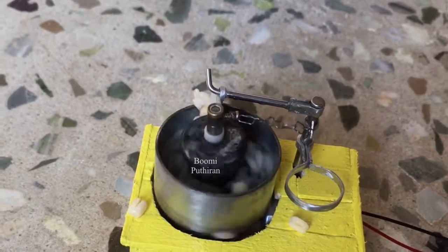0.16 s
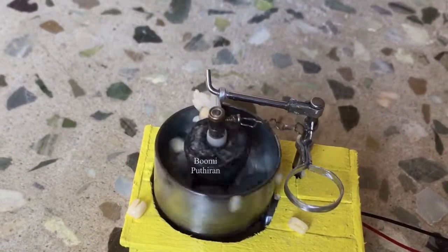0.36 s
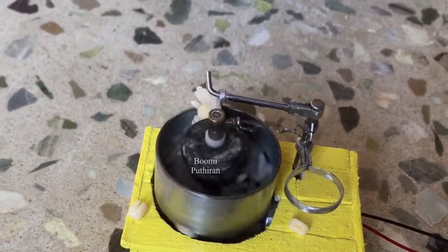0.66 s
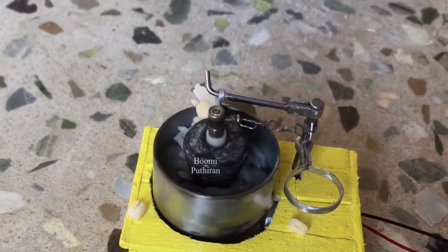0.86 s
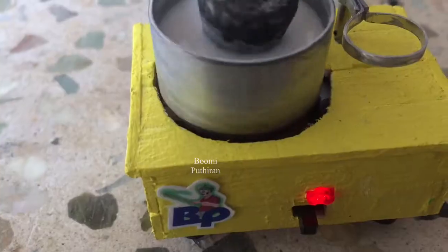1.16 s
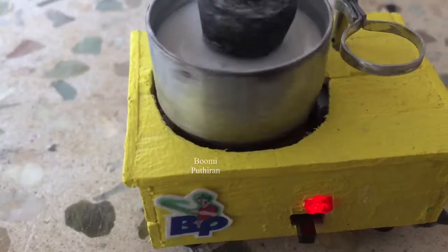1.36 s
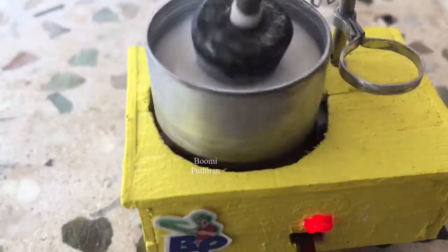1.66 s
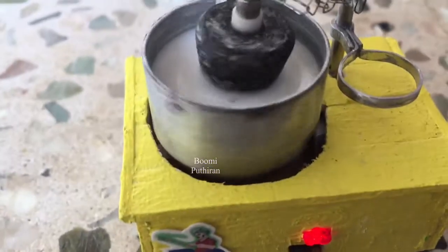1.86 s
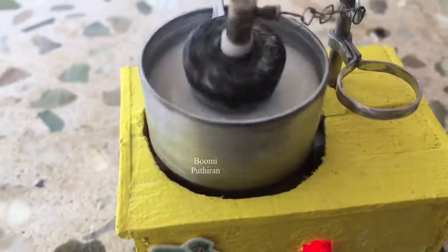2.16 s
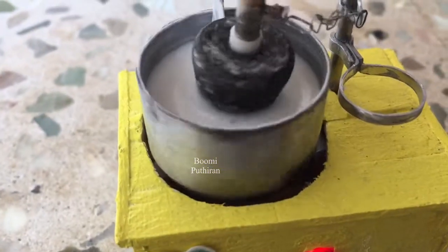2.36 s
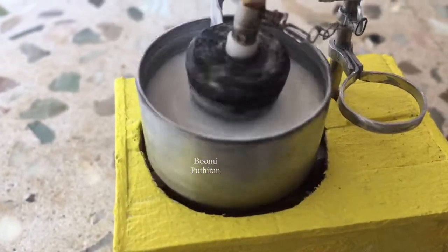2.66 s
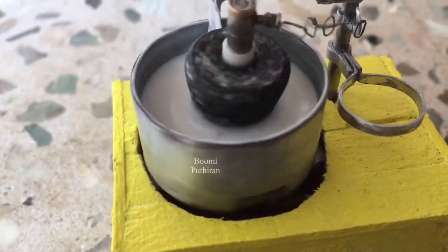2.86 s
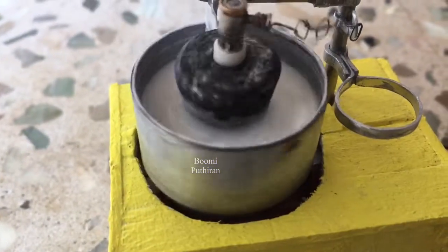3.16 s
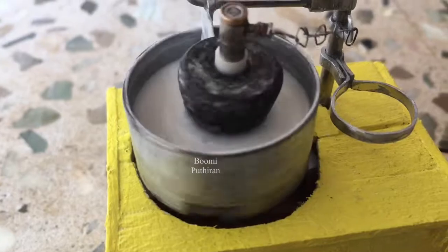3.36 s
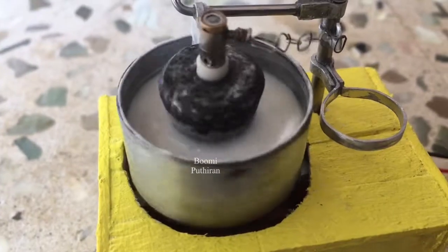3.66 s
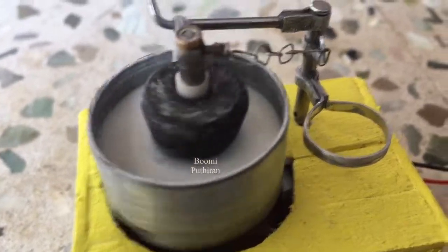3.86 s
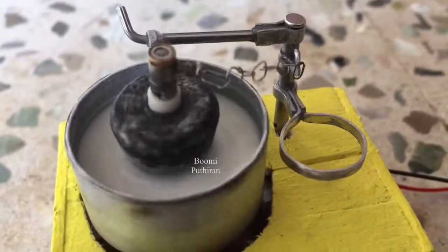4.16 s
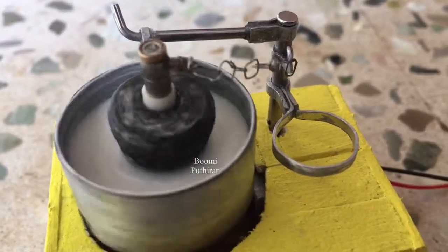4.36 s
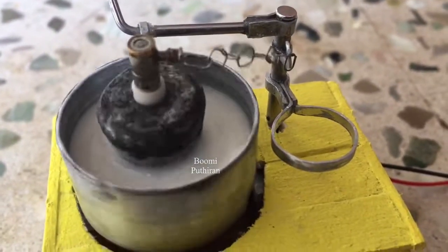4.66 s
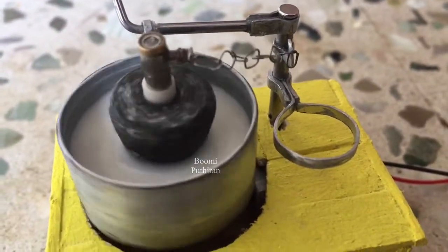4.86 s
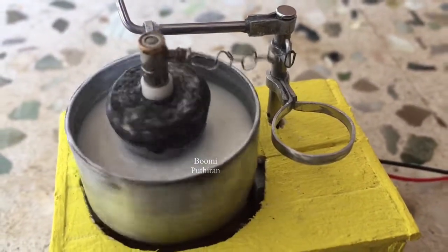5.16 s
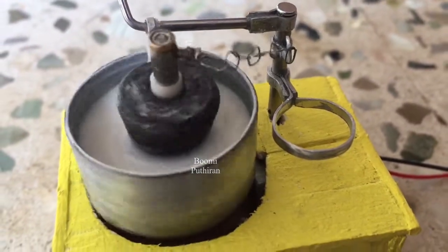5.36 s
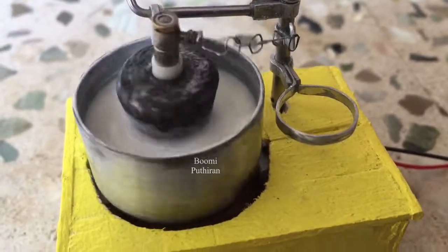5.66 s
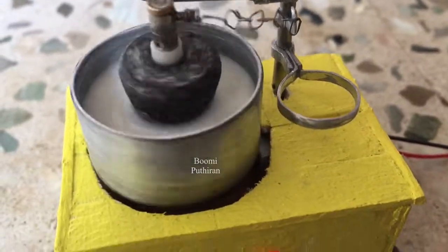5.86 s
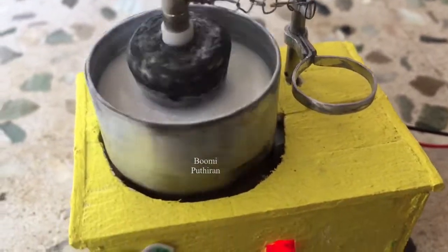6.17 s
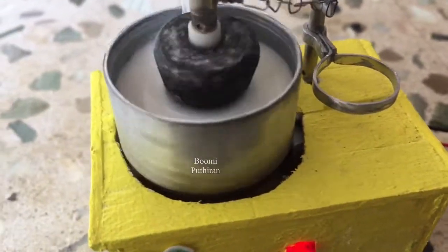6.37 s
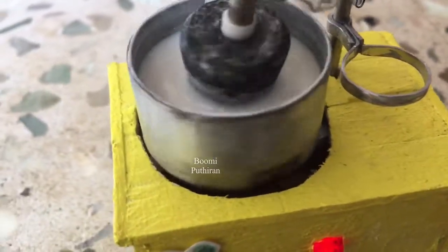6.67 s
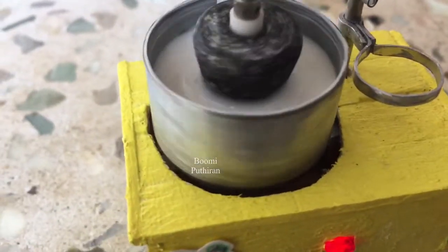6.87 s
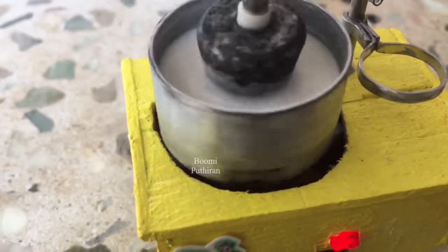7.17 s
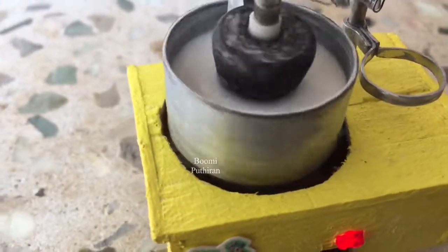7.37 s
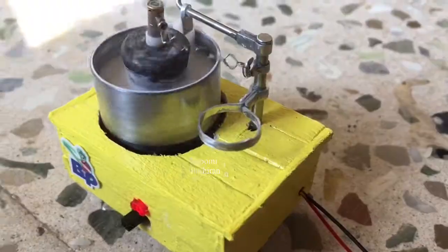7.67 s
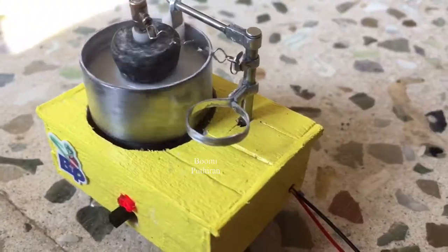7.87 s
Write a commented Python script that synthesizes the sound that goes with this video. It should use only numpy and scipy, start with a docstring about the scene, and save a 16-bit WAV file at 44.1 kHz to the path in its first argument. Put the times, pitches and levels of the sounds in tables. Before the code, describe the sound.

A small table-top wet grinder runs steadily: low boxy motor hum, panel rumble and fast, gritty crackle pulsing about thirty times a second. It starts duller, dips out near one second, then returns closer and brighter with a brief drum ring. Hard metallic clacks follow at once; knocks and ticks cluster near six seconds, a squeak near seven. Another dip leads to a third view. Close microphone, small hard-floored room.

```python
"""On a stone floor, a small table-top wet grinder runs, heard from three places in turn, with fades between.
The motor hums at the lowest resonance of a wooden box, and filtered noise rumbles in the panels.
Showers of clicks through steel resonances make the stone's grit and the drum's ring. They pulse with
the shaft and ease once a drum turn. Noise bursts and ringing modes make the chatter, taps, knocks and
scrapes; the stone slips with a falling squeak, and the drum rings on briefly in wavering partials."""
import sys
import numpy as np
from scipy import signal
from scipy.fft import rfft, irfft
from scipy.io import wavfile
from scipy.ndimage import uniform_filter1d

SR = 44100
rng = np.random.default_rng(int(sys.argv[2]) if len(sys.argv) > 2 else 0)


def unload_wav(signal):
    """Save mono or channel-first audio to the path in sys.argv[1] as 16-bit WAV at rate SR, clipped to [-1, 1]."""
    wavfile.write(
        sys.argv[1],
        SR,
        np.round(np.clip(np.atleast_2d(signal).T, -1, 1) * 32767).astype(np.int16),
    )


N = 353682
T = np.arange(N) / SR


def amp(db):
    """Decibels to gain."""
    return 10 ** (np.asarray(db) / 20)


def unit(x):
    """Scales to rms 1."""
    return x / np.sqrt(np.mean(x ** 2) + 1e-20)


def curve(rows, axis=1):
    """One column of a time table at every sample."""
    rows = np.array(rows)
    return np.interp(T, rows[:, 0], rows[:, axis])


def add(mix, s, sound):
    """Mixes a sound in at time s."""
    part = mix[max(round(s * SR), 0):][:len(sound)]
    part += sound[:len(part)]


def wander(hz):
    """Random drift of rms 1, smoothed so that changes faster than about hz fade away."""
    rolloff = np.exp(-(np.fft.rfftfreq(N, 1 / SR) / hz) ** 2)
    return unit(irfft(rfft(rng.standard_normal(N)) * rolloff, N))


def colour(x, points, size=4096):
    """Causal filter with the given spectrum shape and unit energy."""
    f, db = np.transpose(points)
    hz = abs(np.fft.fftfreq(size, 1 / SR)) + 1
    octaves_outside = np.maximum(np.log2(f[0] / hz), 0) + np.maximum(np.log2(hz / f[-1]), 0)
    level = np.interp(np.log(hz), np.log(f), db) - 60 * octaves_outside
    level = np.maximum(level, -90)
    # minimum phase, so the filter never sounds ahead of its input
    taps = np.fft.ifft(np.exp(signal.hilbert(np.log(amp(level))).conj())).real
    return signal.oaconvolve(x, taps / np.linalg.norm(taps))[:len(x)]


def resonate(x, hz, width):
    """One resonance of gain 1, rung by a decaying rotation."""
    r = np.exp(-np.pi * width / SR)
    return 2 * signal.lfilter([1 - r], [1, -r * np.exp(2j * np.pi * hz / SR)], x).real


def lift(x, peaks):
    """Resonances lift a few narrow bands."""
    return x + sum(amp(db) * resonate(x, hz, width) for hz, width, db in peaks)


def room(x, wet_db, t60):
    """Adds a decaying tail of dense reflections, keeping the power."""
    t = T[:SR // 2]
    tail = rng.standard_normal(len(t)) * amp(-60 * t / t60)
    tail = tail * (t > .003)  # a short gap before the first reflection
    wet = amp(wet_db)
    reflected = signal.oaconvolve(x, tail / np.linalg.norm(tail))[:N]
    return (x + wet * reflected) / np.hypot(1, wet)


def grains(per_s, spread_db):
    """Random clicks, mostly small, a few large."""
    size = amp(spread_db * np.minimum(rng.exponential(1, N), 4))
    sign = rng.choice([-1, 1], N)
    return unit(size * sign * (rng.random(N) < per_s / SR))


def bursts(times, levels_db, lengths, points, rough_db=4.0):
    """Rough contacts that swell and die, each with the energy of its level held for 20 ms."""
    out, t = np.zeros(N), T[:SR // 3]
    for s, db, length in zip(times, levels_db, lengths):
        u = t / (length / 2)
        noise, catch = rng.standard_normal((2, len(t)))
        catch = amp(rough_db * unit(uniform_filter1d(catch, size=16)))  # tiny bounces within the contact
        burst = colour(noise * catch * np.sqrt(u) * np.exp(-u), points)
        add(out, s, amp(db) * burst / np.linalg.norm(burst) * np.sqrt(SR / 50))
    return out


def strike(modes, times, levels_db):
    """Blows ring a set of decaying modes, each with the energy of its level held for 20 ms."""
    out, t = np.zeros(N), T[:SR // 3]
    ring = 0
    for hz, db, t60 in modes:
        ring = ring + amp(db - 60 * t / t60) * np.sin(2 * np.pi * (hz * t + rng.random()))
    ring = ring * (1 - np.exp(-t / 0.00089))  # soft onset
    for s, db in zip(times, levels_db):
        add(out, s, amp(db) * ring / np.linalg.norm(ring) * np.sqrt(SR / 50))
    return out


# microphone places, one a row: fade_in_s, fully_up_s, fade_out_s, silent_s
PLACES = [(-.2, -.1, .92, 1.06), (1.099, 1.24, 7.53, 7.68), (7.695, 7.86, 8.2, 8.3)]


def nearness():
    """Gain of each microphone place over time, rising and falling in straight lines."""
    return [np.interp(T, times, [0, 1, 1, 0]) for times in PLACES]


# base levels at each place: rumble_db, grit_db, drum_db, drum_angle_turns, easing_share (of the pressure)
HEARD = [(-35.5, -40.5, -44, 0.16, 0.25), (-36, -35, -36, 0, 0.7), (-35.5, -34.5, -37.5, 0.023, 1)]
# colour of the box, one list a place: pitch_hz, relative_db (per Hz)
BOX_COLOURS = [
    [(18, -41), (30, -15), (64, 1), (144, -3.5), (171, -7.5), (199, -7.5), (279, -13), (325, -16),
     (341, -17.5), (412, -25), (455, -47), (600, -44), (780, -70), (1320, -120)],
    [(18, -40), (30, -12), (48, -7.5), (69, -6), (113, -5), (140, -6), (171, -7.5), (199, -6), (231, -9.5),
     (259, -8.5), (276, -8), (363, -15), (397, -16), (455, -29), (600, -25), (780, -48), (1320, -120)],
    [(18, -45), (30, -21), (70, -4), (119, -3.5), (140, -12.5), (333, -10.5), (450, -24.5), (600, -38),
     (780, -68), (1320, -120)],
]
# panel resonances of the box: pitch_hz, width_hz, gain_db
PANELS = [(149, 8.6, -14), (203.5, 8.9, -1), (267, 8.5, -5)]
# hum before its trim: time_s, level_db
HUM = [(0.0, -32.5), (1.26, -44), (1.42, -27), (1.56, -42), (1.9, -28.5), (2.02, -48.4), (2.14, -37),
       (2.5, -42), (2.68, -33.5), (3.26, -41), (4.8, -39.5), (5.0, -29), (5.1, -37.5), (5.38, -25.5),
       (5.62, -47), (5.82, -32.5), (6.56, -47), (6.9, -25.5), (7.26, -41), (8.02, -34.2)]
# swells of the rumble: time_s, gain_db
RUMBLE_SWELLS = [(.25, 2.5), (.95, 1), (2.3, -0.5), (2.65, 1), (3.2, 0), (4.3, 1.5), (5.55, -1), (6.1, .5),
                 (6.4, -0.5), (7.3, 1)]
HUM_HZ, HUM_TRIM_DB = 64.14, -3.1  # lowest resonance of the box
HUM_FLUTTER_DB, HUM_FLUTTER_HZ = 4, 14


def motor(near):
    """The motor keeps the box humming at its lowest resonance; the rolling stone rumbles in the panels."""
    phase = 2 * np.pi * HUM_HZ * T + 0.63 * wander(4.7)
    hum = unit(np.cos(phase) * amp(HUM_FLUTTER_DB * wander(HUM_FLUTTER_HZ)))
    bumps = lift(rng.standard_normal(N) * amp(1.44 * wander(26)), PANELS)  # the stone rides over lumps
    rumble = np.zeros(N)
    for fade, (rumble_db, *_), points in zip(near, HEARD, BOX_COLOURS):
        rumble += fade * amp(rumble_db) * unit(colour(bumps, points))
    return amp(curve(HUM) + HUM_TRIM_DB) * sum(near) * hum + amp(curve(RUMBLE_SWELLS)) * rumble


# knocks and scuffs, level before the top is cut: time_s, level_db, length_s, top_hz
KNOCKS = [(1.178, -33.5, 0.036, 2520), (3.617, -38.5, 0.024, 900), (5.357, -32, 0.076, 4000),
          (5.399, -34, .053, 3200), (5.447, -36, 0.012, 1200), (5.965, -22.5, 0.02, 4000),
          (5.996, -29, 0.033, 2500), (6.073, -33, 0.024, 890), (6.1, -28.5, .003, 1280),
          (6.11, -29, .0052, 1200), (6.134, -33, .014, 1100), (6.884, -42, .0043, 2000),
          (7.383, -40, 0.057, 1500), (7.493, -41.5, 0.031, 2000)]
# colour of a knock on the box: pitch_hz, relative_db (per Hz)
WOOD = [(150, -33), (250, -12.5), (443, -5.5), (624, -10), (700, -11), (908, -7.5), (1110, -12),
        (1200, -16), (1640, -6), (1840, -25), (3000, -14), (3900, -46), (6600, -120)]
# board resonances under a knock: pitch_hz, width_hz, gain_db
BOARDS = [(377, 29, 2.5), (706, 74, 6.5), (1093, 70, 2)]


def knocks():
    """Dull blows and scuffs of the wooden box; soft contacts lack the top."""
    out = np.zeros(N)
    for s, db, length, top_hz in KNOCKS:
        top_cut = signal.butter(3, top_hz, fs=SR, output="sos")
        out += signal.sosfilt(top_cut, bursts([s], [db], [length], WOOD))
    return room(lift(out, BOARDS), wet_db=-11, t60=.2)


# taps of the arm's links: time_s, ring_db, tick_db
TAPS = [(.331, -46, -36), (1.423, -44, -35), (2.397, -37, -53), (2.841, -40.5, -45), (2.881, -44, -34),
        (3.191, -37, -43), (3.697, -35, -34), (5.361, -36, -47), (5.725, -32.5, -32), (5.803, -38.5, -49),
        (5.836, -30.5, -29.5), (5.883, -38.5, -31), (5.913, -37, -29), (5.938, -35, -31),
        (5.966, -28.5, -28), (6.882, -24.5, -31), (7.118, -59, -33), (7.194, -33, -28), (7.238, -31, -28.5),
        (7.305, -34, -30.5), (7.488, -35, -30), (7.595, -32, -28.5)]
# modes of the arm: pitch_hz, relative_db, t60_s
LINK_MODES = [(1064, -7, 0.022), (1700, 6, 0.02), (1750, 5, 0.016), (3390, -9, 0.018)]
# colour of a bare steel-on-stone tick: pitch_hz, relative_db (per Hz)
TICK = [(2500, -12), (4500, -7), (5600, -8), (8400, -1), (11000, 1), (13500, 2), (15800, -5)]
RING_DELAY_S = 0.001013  # a ring starts just after its tick


def links():
    """The loose arm taps its post: a noisy tick, then a short ring of its modes."""
    s, ring_db, tick_db = np.transpose(TAPS)
    ring = strike(LINK_MODES, s + RING_DELAY_S, ring_db)
    tick = bursts(s, tick_db, .0035 * np.ones(len(s)), TICK)
    return room(ring + tick, wet_db=-5.5, t60=0.16)


# partials of the ringing drum: pitch_hz, relative_db
DRUM_PARTIALS = [(287, -5), (684, 0), (1055, -5), (1287, -13), (1362, -8), (1705, -2), (1808, -4),
                 (1960, -10), (2110, -6.5)]
DRUM_RING_DB, HOLD_UNTIL_S, DRUM_RING_T60_S = -31.5, 1.23, 0.32


def drum_ring():
    """The drum rings on: narrow, wavering partials hold briefly, then die away."""
    tone = np.zeros(N)
    for hz, db in DRUM_PARTIALS:
        phase = 2 * np.pi * hz * T + hz / 2500 * wander(40)
        tone += amp(db + 2.5 * wander(60)) * np.sin(phase)
    dying_db = -60 * np.maximum(T - HOLD_UNTIL_S, 0) / DRUM_RING_T60_S
    sounding = T > PLACES[1][0]  # from the second place's fade-in
    return sounding * amp(DRUM_RING_DB + dying_db) * unit(tone)


# the stone's edge scrapes the drum wall, level before its flutter: time_s, level_db, length_s
SCRAPES = [(1.501, -27, 0.12), (1.574, -28.5, 0.066), (5.37, -46, 0.053), (5.728, -34, 0.028),
           (5.833, -34, 0.043), (5.875, -29, 0.13), (5.931, -33, 0.062), (5.97, -37, 0.035),
           (7.201, -37, 0.014), (7.243, -36, 0.027), (7.303, -42, 0.027), (7.495, -38, 0.03)]
# colour of a scrape: pitch_hz, relative_db (per Hz)
SCRAPE_COLOUR = [(1200, -45), (2100, 4), (2600, -7.5), (3300, 2), (3900, 0), (4600, -10), (7000, -7.5)]


def scrapes():
    """Short rasps of stone on steel: coloured noise with a fast flutter."""
    s, db, length = np.transpose(SCRAPES)
    return bursts(s, db, length, SCRAPE_COLOUR) * amp(2.3 * wander(130))


# the slipping stone's squeak: time_s, pitch_hz, level_db (of the sine's peak)
SQUEAK = [(6.88, 1760, -60), (6.886, 1684, -29), (6.902, 1610, -29), (6.914, 1290, -31), (6.94, 1290, -51)]


def squeak():
    """The stone slips with a short, falling tone, roughened by a fast phase wobble."""
    cycles = np.cumsum(curve(SQUEAK, axis=1)) / SR
    sounding = (T > SQUEAK[0][0]) & (T < SQUEAK[-1][0])
    tone = np.sin(2 * np.pi * cycles + 0.84 * wander(200))
    return sounding * amp(curve(SQUEAK, axis=2)) * tone


# stone and arm strike the steel: time_s, clang_db, tick_db
CLACKS = [(1.484, -18.5, -23.5), (1.513, -18, -25), (1.553, -19, -26), (1.577, -20, -30),
          (1.601, -19.5, -29), (1.638, -23, -30), (1.664, -30, -37)]
# colour of a hard blow: pitch_hz, relative_db (per Hz)
CLANG = [(330, -53), (560, -14), (616, -24), (732, -8), (912, -5), (1010, 4), (1470, -11), (1620, 8),
         (1750, -6), (2160, -8), (2740, -25), (3010, -14.5), (3510, -26), (4540, -15), (5500, -45),
         (7150, -92), (12100, -120)]
# modes of the steel under a blow: pitch_hz, relative_db, t60_s
STEEL_MODES = [(1014, 1, 0.044), (1140, -2, 0.057), (1676, 1, 0.015), (1810, -3, 0.071), (2110, 1, 0.023),
               (2960, -10, 0.036), (3760, -15.5, .05), (4480, -11, 0.037)]
STEEL_DB = -6.5  # the modes against the clang
BOUNCE, BOUNCE_S = 0.22, .0049  # gain and delay of the reflection off the floor


def chatter():
    """Hard blows: a bright tick, then the clang of the steel and its bounce off the floor."""
    s, clang_db, tick_db = np.transpose(CLACKS)
    each = np.ones(len(s))
    clang = bursts(s + RING_DELAY_S, clang_db, 0.0035 * each, CLANG, rough_db=3.0)
    clang = clang + strike(STEEL_MODES, s + RING_DELAY_S, clang_db + STEEL_DB)
    clang = clang + BOUNCE * np.interp(T - BOUNCE_S, T, clang)
    tick = bursts(s, tick_db, 0.0051 * each, TICK)
    return room(clang + tick, wet_db=-6, t60=.33)


# motor speed: time_s, shaft_hz (turns a second)
SHAFT = [(0.0, 31.9), (0.33, 30.96), (0.94, 31.18), (1.61, 32.45), (2.02, 30.29), (2.35, 30.62),
         (2.67, 32.45), (3.35, 31.48), (3.63, 32.0), (4.35, 31.44), (4.65, 30.14), (5.47, 30.26),
         (6.1, 32.14), (6.35, 32.28), (6.65, 31.57), (7.02, 29.69), (7.23, 29.51), (8.0, 32.11)]


def shaft():
    """Turns of the motor shaft so far, summed from its speed."""
    return np.cumsum(curve(SHAFT)) / SR


# stone pressure round one drum turn, building, holding and letting go: drum_angle_turns, pressure_db
TURN = [(.06, -6), (.2, -4.5), (.41, -0.7), (.77, -1.05), (.83, -3), (.92, -13.5)]


def pressure(drum_turns):
    """Pressure of the stone in dB, easing once every drum turn."""
    angle, db = np.transpose(TURN)
    return np.interp(drum_turns, angle, db, period=1)


# colour of the drum's ring, one list a place: pitch_hz, relative_db (per Hz)
DRUM_COLOURS = [
    [(260, -27), (450, -3.5), (591, -9), (776, -2), (1270, -10), (1460, -2.5), (1990, -11), (2130, -5),
     (2400, -6.5), (3710, -23.5), (4210, -9), (4600, -23), (5980, -49), (10100, -120)],
    [(260, -16.5), (450, -13), (608, -15), (677, -6.5), (847, -11.5), (1140, -15), (1270, -8), (1450, -8.5),
     (1860, -2.5), (2090, -8), (2970, -17.5), (3370, -18.5), (3640, -16), (4340, -19.5), (4600, -22),
     (5980, -21), (10100, -120)],
    [(260, -58), (450, -18), (472, -31), (511, -23), (677, -18.5), (1140, -23.5), (1920, -12.5),
     (2880, -29.5), (3570, -25.5), (4600, -34), (5980, -50), (10100, -120)],
]
# colour of the grit, one list a place: pitch_hz, relative_db (per Hz)
GRIT_COLOURS = [
    [(2590, -29), (4400, -10), (4620, -28), (4840, -9), (5750, -8), (7270, -9), (9970, -3.5), (12300, -7.5),
     (13800, -6), (15800, -17)],
    [(2590, -44), (4400, -9), (4670, -5), (5030, -6.5), (5450, -2.5), (5970, -8.5), (6570, -3), (7160, -5),
     (7920, -1.5), (8590, 2.5), (9210, -3.5), (9820, 0), (10900, 2), (14700, -4.5), (15800, -9)],
    [(2590, -29), (4400, -15), (4820, -17), (6300, -6.5), (7310, -12), (8540, -3), (9660, -5), (10500, -7),
     (12500, -10), (15800, -15)],
]
# narrow resonances of the drum wall, rung by the grit: pitch_hz, width_hz, gain_db
WALL = [(1870, 47, -3.5), (3371, 86, 7), (6370, 400, -9), (8720, 190, -13), (9740, 210, -5.5),
        (10900, 120, -15), (12500, 180, -66)]
# slow load on the stone, heavier when it bites into the batter: time_s, grit_gain_db, drum_gain_db
LOAD = [(.15, 1.5, 1.5), (.45, -1, 0.5), (.9, -0.5, 0.5), (1.2, 0, 0.5), (1.55, -1, 0), (1.8, -1, -1),
        (2.55, .3, 0), (4.5, .8, .5), (4.76, -2.5, -1.8), (5.0, 1, 0.5), (5.25, -1.5, -1), (5.95, 2, 0),
        (6.17, -5, -1.5), (6.35, 1, 0), (6.75, 1.5, -0.5), (7.05, 1, 0.5), (7.25, 0, 0.5), (7.6, 2.5, 4),
        (7.8, -1, -2)]
GEARING = 14.85  # shaft turns to one drum turn
DRUM_SHARE = 0.46  # the drum's ring follows this share of the pressure in dB


def grinding(turns, near):
    """Grit cracks under the stone in a flurry each shaft turn; the drum answers with a duller ring."""
    angle = 2 * np.pi * (turns + .23) + .3 * wander(12)
    throb = np.cos(angle) + 0.059 * np.cos(2 * angle) + 0.083 * np.cos(3 * angle)
    slips_db = 3.3 * wander(215)  # the stone catches and lets go
    cracks = grains(6000, 2.3) * amp(3.15 * throb + slips_db)
    crackle = lift(room(cracks, wet_db=-14.5, t60=0.087), WALL)
    bumps = grains(1600, 0.69) * amp(1.64 * throb + .5 * slips_db)
    roll = lift(room(bumps, wet_db=-8.5, t60=0.85), WALL)
    lumps_db = 0.95 * wander(22.5)  # no two drum turns are alike
    out = np.zeros(N)
    for fade, heard, grit, drum in zip(near, HEARD, GRIT_COLOURS, DRUM_COLOURS):
        _, grit_db, drum_db, start, easing = heard
        press_db = easing * pressure(turns / GEARING + start) + lumps_db
        grit_level = amp(grit_db + curve(LOAD, axis=1) + press_db)
        drum_level = amp(drum_db + curve(LOAD, axis=2) + DRUM_SHARE * press_db)
        out += fade * grit_level * unit(colour(crackle, grit))
        out += fade * drum_level * unit(colour(roll, drum))
    return out


def scene():
    """The whole machine, heard from three places in turn, with fades between them."""
    near = nearness()
    contacts = knocks() + links() + drum_ring() + scrapes() + squeak() + chatter()
    return (motor(near) + sum(near) * contacts + grinding(shaft(), near))[None]


LOW_CUT_HZ, EDGE_HZ = 32, 15900


def record(dry):
    """The microphone loses the deepest bass, then a steep filter limits the treble."""
    low_cut = signal.butter(4, LOW_CUT_HZ, "highpass", fs=SR, output="sos")
    heard = signal.sosfilt(low_cut, dry)
    band_limit = signal.firwin(511, EDGE_HZ, window=("kaiser", 9), fs=SR)
    return signal.oaconvolve(heard, band_limit[None], "same")


dry = scene()
out = record(dry)
unload_wav(out)
```